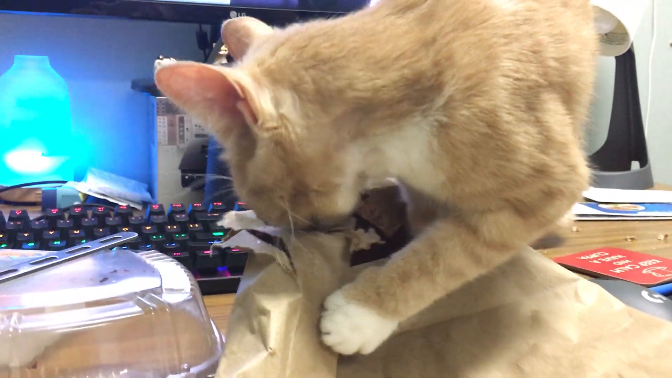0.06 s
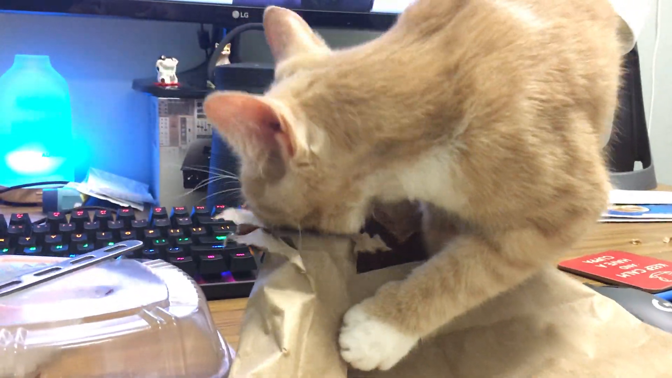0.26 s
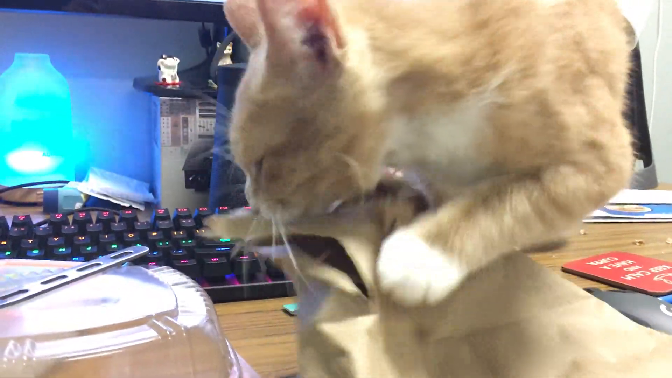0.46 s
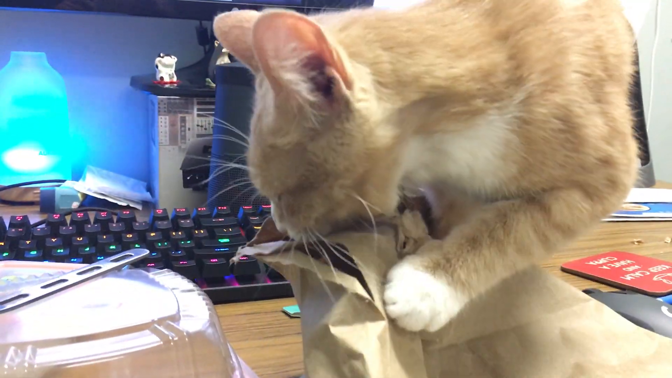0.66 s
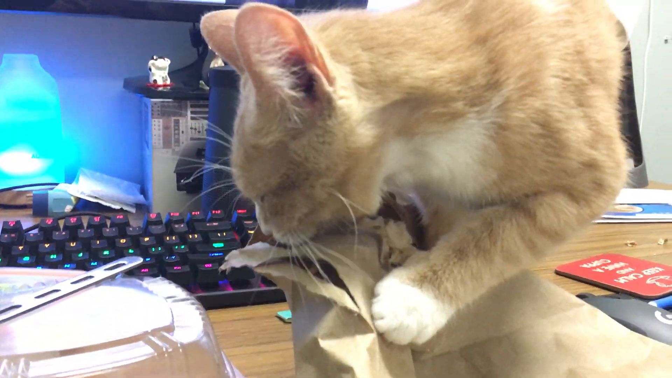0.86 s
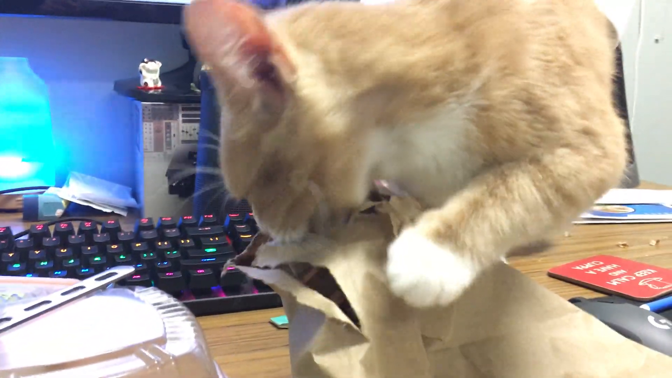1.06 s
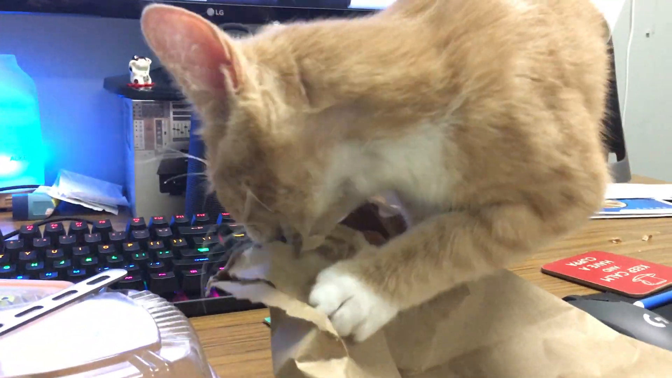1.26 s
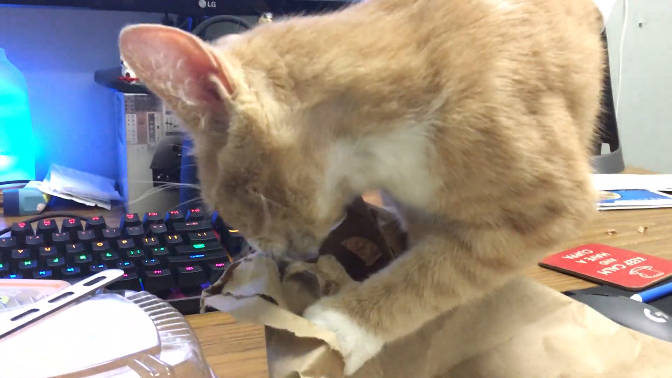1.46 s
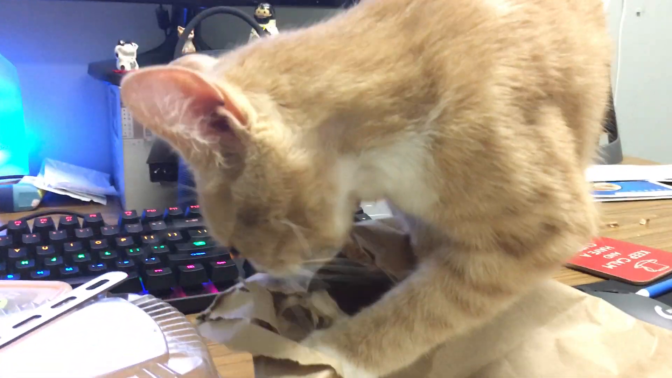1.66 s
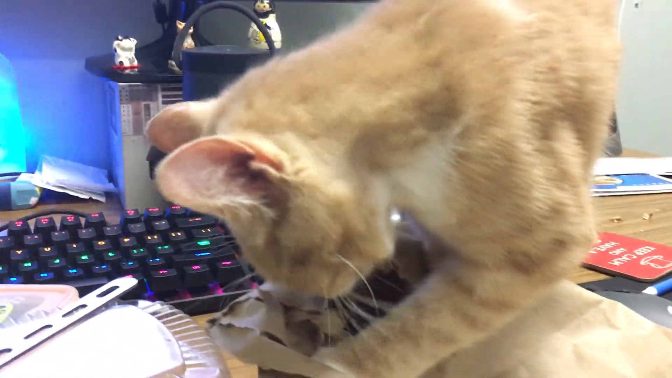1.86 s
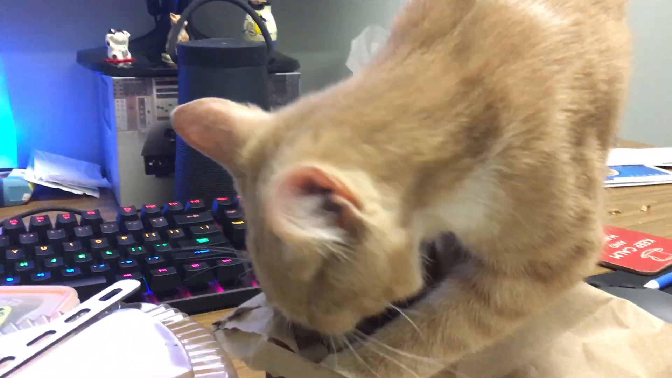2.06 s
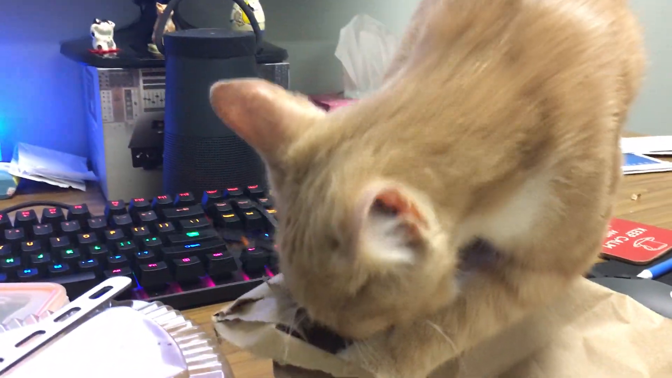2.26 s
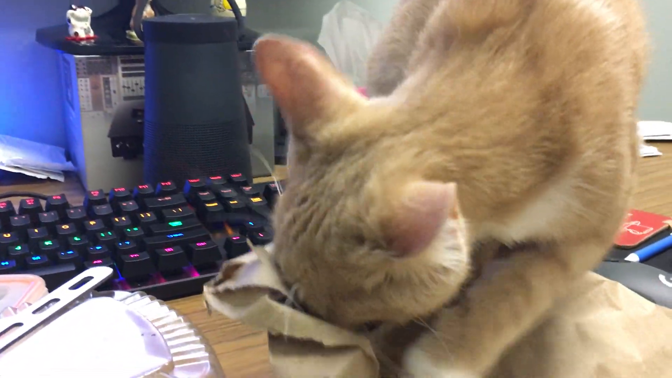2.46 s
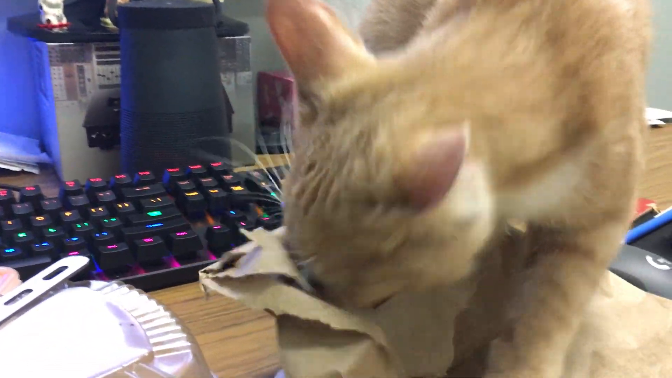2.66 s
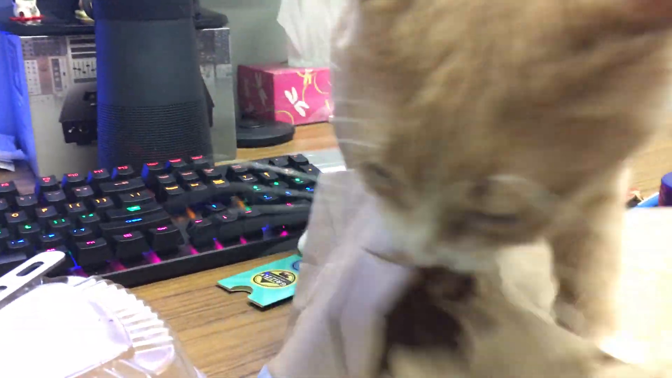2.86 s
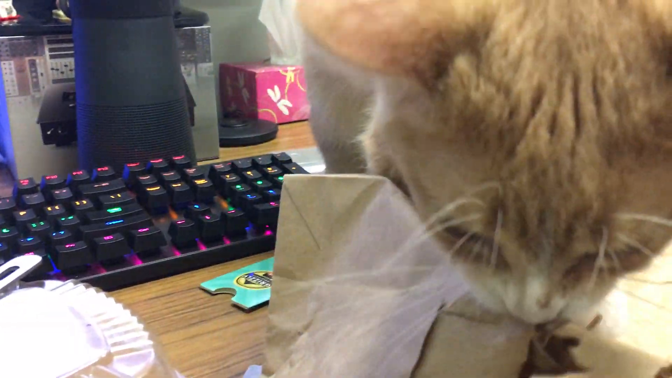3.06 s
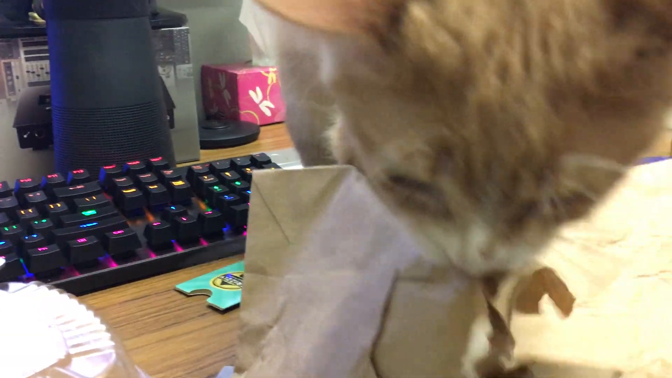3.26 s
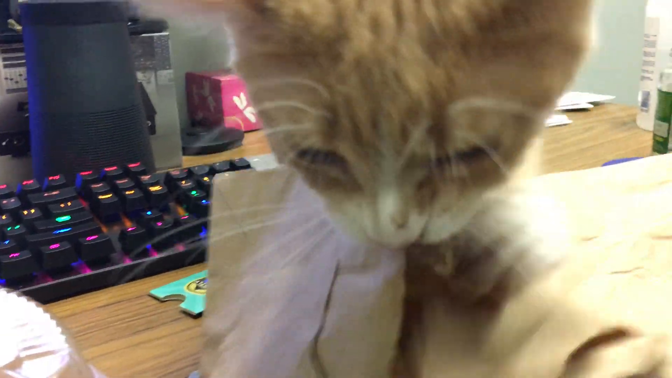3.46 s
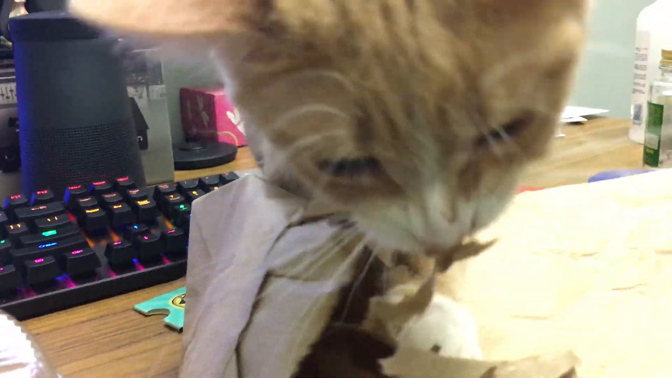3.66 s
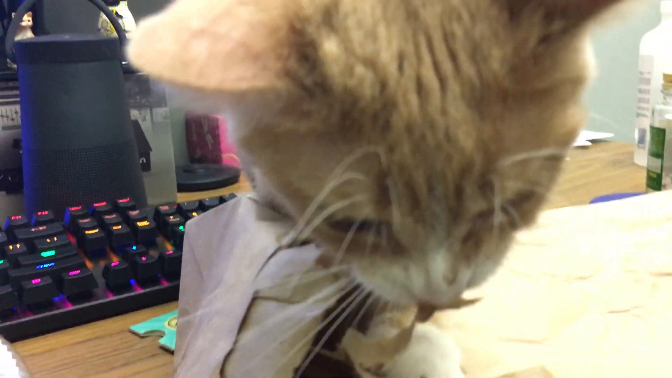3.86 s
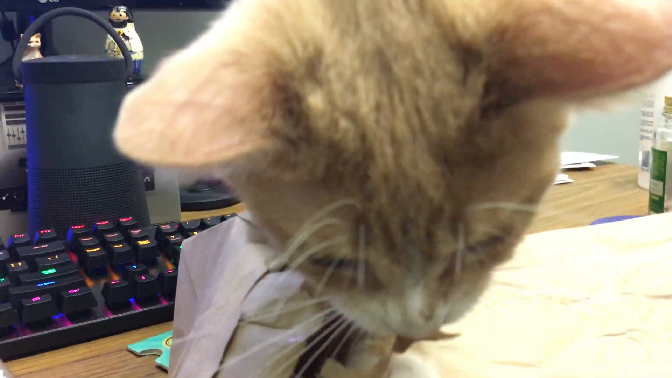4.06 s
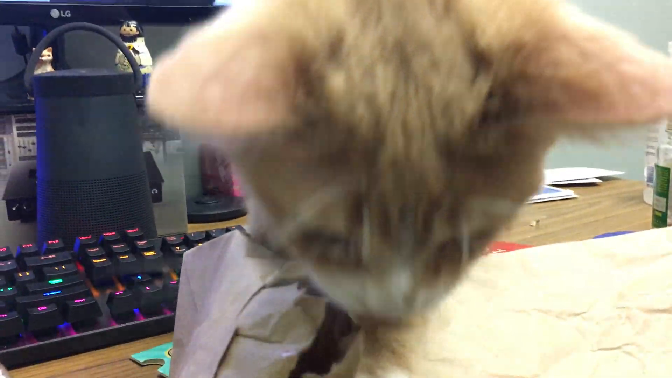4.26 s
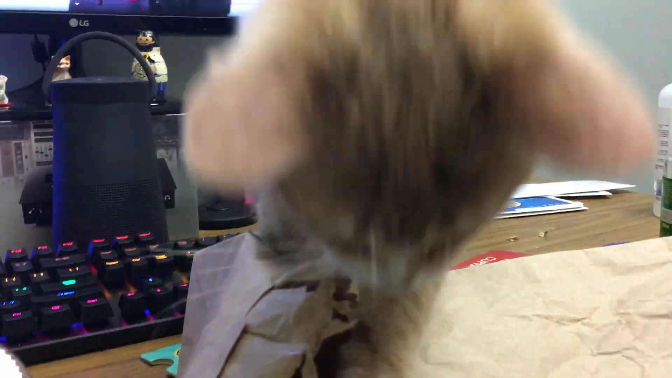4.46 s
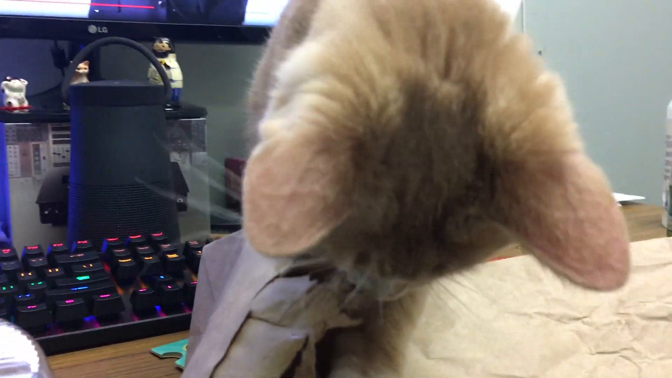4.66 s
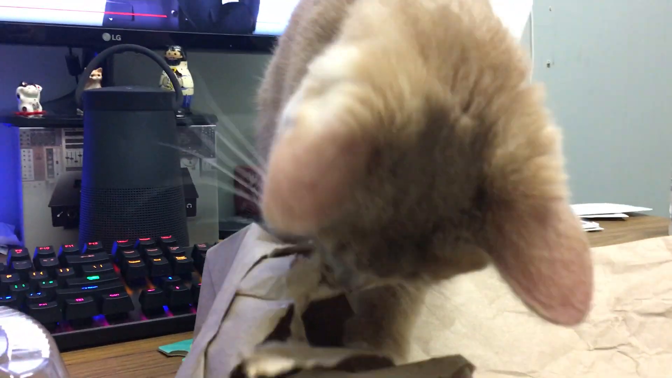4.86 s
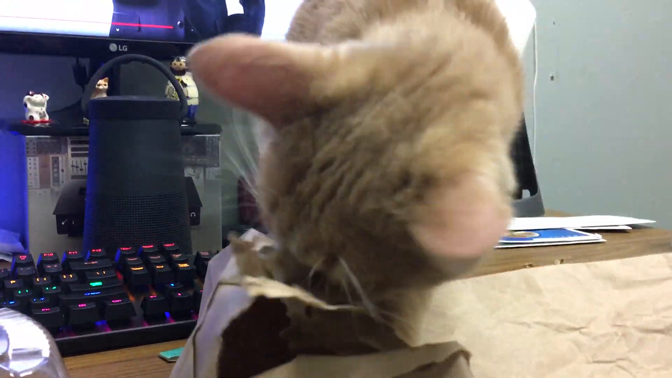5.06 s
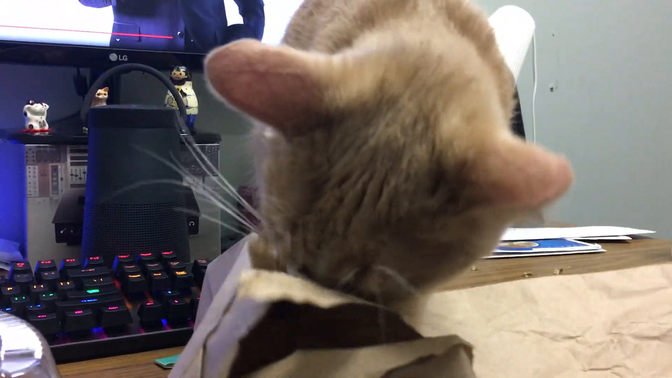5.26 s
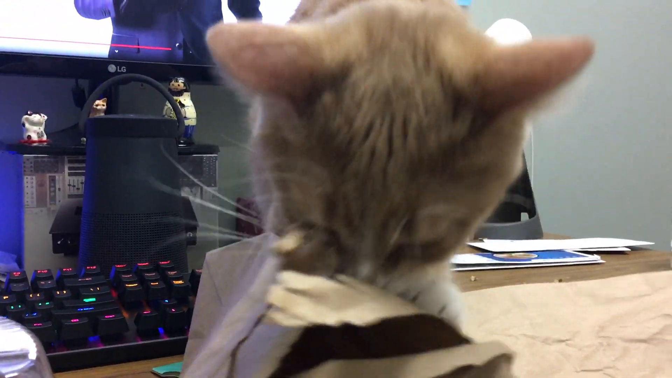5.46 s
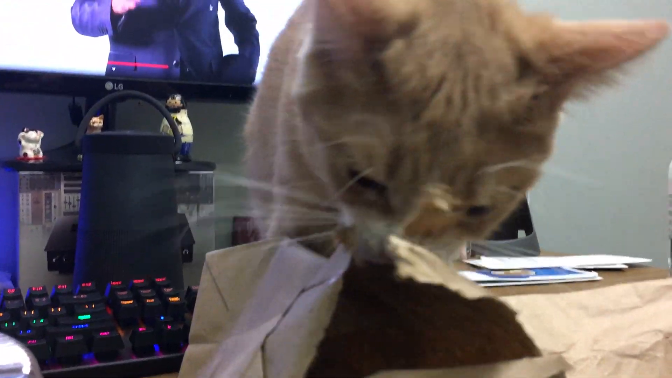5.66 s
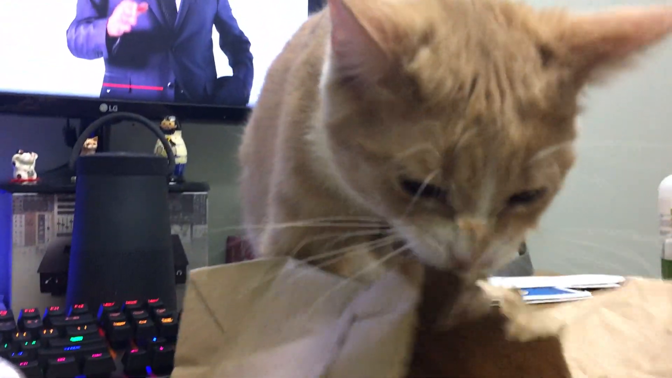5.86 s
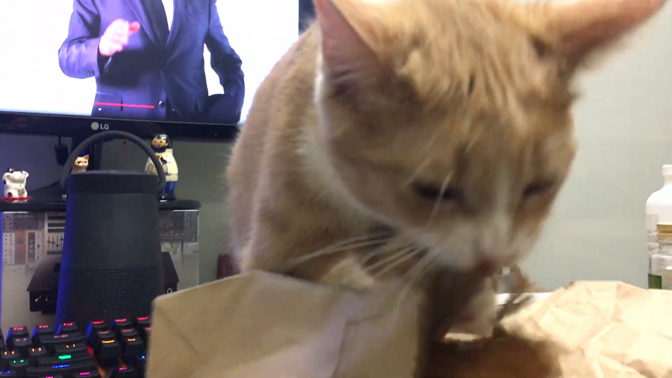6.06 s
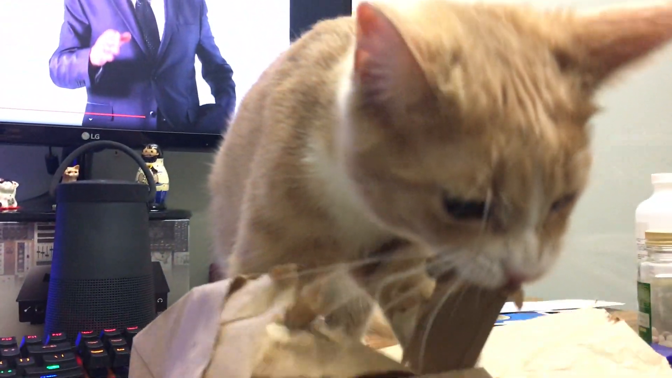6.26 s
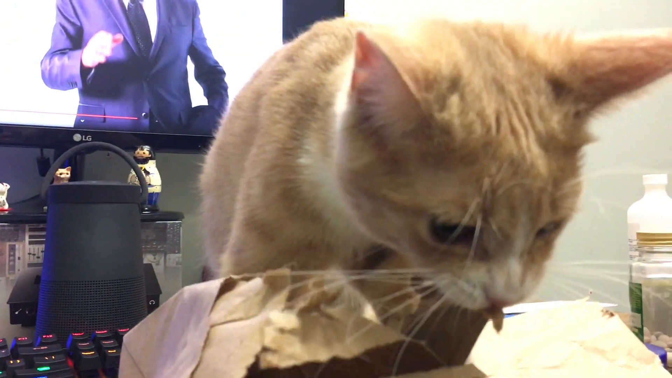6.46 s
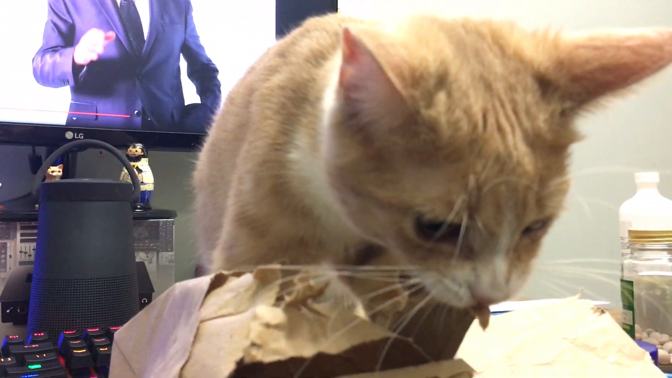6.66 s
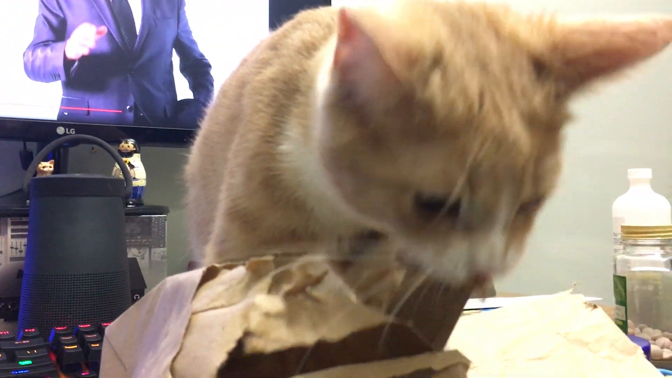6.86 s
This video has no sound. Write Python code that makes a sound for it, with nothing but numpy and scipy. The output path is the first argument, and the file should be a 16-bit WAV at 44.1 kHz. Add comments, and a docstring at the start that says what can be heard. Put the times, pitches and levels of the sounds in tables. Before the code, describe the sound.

Dry, close paper handling: slow rustles broken by crisp crease pops, short rips and hard clicks, with low muffled paw thumps on the desk top. Activity comes in clumps, strong around three seconds, nearly silent after four, loudest between five and a half and just past six, with a tiny high metal tinkle near its end. Then only a low fan hum and soft hiss remain in the small, slightly echoing room.

```python
"""A fan hums over microphone hiss in a small quiet room while a kitten works a paper bag on a desk.
Paper rustles, then creases snap: noise grains and slip bursts, through panel resonances and sheet colour.
Teeth rip it in dense swells of grains, paws thump the desk's low modes, stiff folds crack as clicks.
Late on, a small metal piece tinkles once as struck sines. Paper and metal also feed a short dull echo."""
import sys
import numpy as np
from scipy import signal
from scipy.fft import rfft, irfft
from scipy.io import wavfile

SR = 44100
rng = np.random.default_rng(int(sys.argv[2]) if len(sys.argv) > 2 else 0)


def unload_wav(signal):
    """Save mono or channel-first audio to the path in sys.argv[1] as 16-bit WAV at rate SR, clipped to [-1, 1]."""
    wavfile.write(
        sys.argv[1],
        SR,
        np.round(np.clip(np.atleast_2d(signal).T, -1, 1) * 32767).astype(np.int16),
    )


N = 304731


def amp(db):
    """Decibels to a linear gain."""
    return 10 ** (np.asarray(db) / 20)


def rms_one(x):
    """Scale a signal to an rms of 1."""
    return x / np.sqrt(np.mean(x ** 2) + 1e-20)


def at_hz(points, hz):
    """Read a spectrum in dB, straight between its points on a log frequency axis."""
    points_hz, points_db = np.array(points).T
    return np.interp(np.log(hz), np.log(points_hz), points_db)


def coloured(x, spectrum):
    """A causal minimum-phase filter of the given spectral shape; white noise keeps its rms."""
    size = 8192
    bins_hz = np.maximum(np.arange(size // 2 + 1) * SR / size, 1)
    cepstrum = irfft(np.log(amp(at_hz(spectrum, bins_hz))))
    cepstrum[1:size // 2] *= 2      # folding the cepstrum makes the phase minimum
    response = irfft(np.exp(rfft(cepstrum[:size // 2], size)))
    return signal.fftconvolve(x, response / np.sqrt(np.sum(response ** 2)))[:N]


def drift(rate_hz):
    """Slow random wander, spread 1: noise through two equal low-pass poles."""
    step = 40      # samples between computed points
    r = np.exp(-2 * np.pi * rate_hz * step / SR)
    noise = rng.standard_normal(N // step + 2002)
    slow = signal.lfilter([1], [1, -2 * r, r * r], noise)[2000:]
    return np.interp(np.arange(N) / step, np.arange(len(slow)), rms_one(slow))


def ring(clicks, hz, t60_s):
    """A struck mode: a unit click sets off a decaying sine of starting height 1."""
    r, w = amp(-60 / (t60_s * SR)), 2 * np.pi * hz / SR
    return signal.lfilter([0, np.sin(w)], [1, -2 * r * np.cos(w), r * r], clicks + 1e-18)


def panel(x, hz, sharpness):
    """A flat patch of paper between creases: one broad resonance, gain 1 on top."""
    return signal.lfilter(*signal.iirpeak(hz, sharpness, fs=SR), x)


# Tone of fan and hiss together: (f/Hz, relative level/dB per Hz)
HUM_TONE = [(25, -8), (60, 3), (95, -5.5), (130, -1.5), (240, -12), (480, -21), (1500, -31.5), (4800, -51),
            (10500, -37), (13000, -36)]
HUM_DB = -55.5      # rms level


def fan_and_hiss():
    """Steady noise shaped to the low hum of the fan and the high hiss of the microphone."""
    return amp(HUM_DB) * coloured(rng.standard_normal(N), HUM_TONE)


# Paper worked slowly by paws and fur: (t/s, body level/dB, treble level/dB), before the paper colour
RUSTLE_CURVE = [(0.0, -55.5, -58.5), (0.2, -68.5, -62.5), (0.421, -48, -53), (0.7, -67.5, -61),
                (0.87, -73.5, -71.5), (1.19, -68, -65.5), (1.25, -58, -57.5), (1.45, -65, -62),
                (1.82, -58.5, -59.5), (2.04, -64.5, -70), (2.249, -59, -54.5), (2.45, -64, -63.5),
                (2.85, -47, -50.5), (3.15, -60, -63), (3.5, -67.5, -67), (3.75, -66.5, -60),
                (4.0, -73.5, -79), (4.22, -74.5, -74.5), (4.45, -68.5, -65), (4.98, -66.5, -68.5),
                (5.19, -61.5, -57.5), (5.45, -64, -64), (5.75, -52, -49.5), (6.281, -48, -46.5),
                (6.35, -56.5, -81), (6.39, -64, -55), (6.57, -76.5, -74.5), (6.91, -74, -90)]


def rustle_levels():
    """Body and treble level of the slow rubbing, gliding in dB from point to point."""
    s, *levels_db = np.transpose(RUSTLE_CURVE)
    t = np.arange(N) / SR
    return amp([np.interp(t, s, db) for db in levels_db])


RIP_SLIDE = 0.35      # gain of the smooth slide within a rip


def crackle(rustle, rips, panels_hz, typical_per_s, size_db, grain_ms, grain_db, rip_grain_db):
    """Clumped grains, each a short puff on one of the panels, over a patchy slide; rips favour grains."""
    born = rng.random(N) < typical_per_s * amp(6.0 * drift(25)) / SR
    sizes = amp(size_db * np.minimum(rng.exponential(1, N), 2.2))
    dealt = rng.integers(0, len(panels_hz), N)      # the panel each grain lands on
    fade = np.exp(-1000 / grain_ms / SR)
    grains = np.zeros(N)
    for k, hz in enumerate(panels_hz):
        puff = signal.lfilter([1], [1, -fade], born * sizes * (dealt == k) + 1e-18)
        grains += rms_one(panel(puff * rng.standard_normal(N), hz, 3.9))
    slide = rng.standard_normal(N) * amp(2.0 * drift(30) + 1.5 * drift(10))
    grain_level = amp(grain_db) * rustle + amp(rip_grain_db) * rips
    slide_level = rustle + RIP_SLIDE * rips
    return grain_level * rms_one(grains) + slide_level * slide


# Creases buckling: (t/s, relative strength level/dB, treble level re strength/dB, panel pitch f/Hz)
CREASES = [(0.135, -33, -22, 1810), (0.297, -29, -6, 1020), (0.415, -22, -9.5, 4330),
           (0.436, -26, -10, 2020), (0.467, -10.5, -6, 1134), (0.49, -22.5, -12, 1900),
           (0.567, -29, -12, 4530), (1.269, -28, -17, 1820), (1.338, -35, -46, 1010),
           (1.394, -29.5, -10, 1900), (1.417, -24.5, -10.5, 1180), (1.461, -23, -14, 2140),
           (1.668, -17, -10.5, 3600), (1.7, -18, 1, 1890), (1.8746, -17.5, -17.5, 3540),
           (1.886, -12, -14.5, 1126), (1.932, -31, -18, 2480), (2.071, -12, -14.5, 3040),
           (2.459, -29.5, -15, 1900), (2.511, -22.5, -3, 2530), (2.551, -27.5, -11, 1840),
           (2.567, -25, -12.5, 1100), (2.637, -25, -17, 990), (2.718, -21, -11, 2500),
           (2.721, -12, -7, 1300), (2.754, -19.5, -11, 2000), (2.793, -14, -24, 925),
           (2.808, -7, -8.5, 1810), (2.839, -14, -14, 690), (2.93, -10.5, -15, 1690),
           (2.955, -16, -6, 4300), (3.092, -17.5, -12, 940), (3.255, -22.5, -18.5, 1800),
           (3.272, -20, -20, 2480), (3.357, -5, -6, 1930), (3.536, -20, -11.5, 2200),
           (3.56, -14, -11.5, 1540), (3.588, -9, -7, 1640), (3.708, -21, -9.5, 1800),
           (3.854, -22, -16, 1700), (3.862, -11, -4.5, 3400), (3.865, -13, -33, 1590),
           (4.257, -42, -13, 2520), (4.402, -37.5, -4, 1060), (4.78, -30.5, -40, 1050),
           (4.805, -36, -58, 1060), (4.852, -24.5, -45, 1710), (4.877, -24, -16, 1400),
           (4.952, -26, -47, 1530), (4.965, -36, -24, 2900), (5.134, -37, -41, 1700),
           (5.308, -30.5, 4, 2400), (5.379, -34, -13, 1700), (5.43, -30.5, -38.5, 1070),
           (5.468, -26, -40.5, 1250), (5.475, -11, -14.5, 3470), (5.512, -22.5, -15, 1940),
           (5.523, -17.5, -27, 3250), (5.54, -14, -15.5, 1440), (5.559, -19.5, -15, 1985),
           (5.574, -12.5, -8.5, 3040), (5.601, -17, -1.5, 900), (5.617, -17.5, -18, 1500),
           (5.653, -12.5, -3.5, 1650), (5.685, -15.5, -20.5, 2650), (5.704, -21, -9, 1690),
           (5.778, -18.5, -16, 1720), (5.801, -11, 0.5, 1200), (5.832, -23, -5, 3000),
           (5.847, -18, -2.5, 1950), (5.919, -12.5, -8.5, 3320), (5.975, -18, -10, 3820),
           (6.048, -10.5, -10.5, 3500), (6.062, -19, 1, 1590), (6.133, -8, -10.5, 4500),
           (6.213, -11, -19, 2360), (6.236, -28, 4, 810), (6.305, -15.5, -8.5, 2380),
           (6.374, -33, -5, 3170)]
PANEL_SHARPNESS = 6.0
PANEL_DB, PANEL_GAIN = -17, 0.27      # knock at a treble of 0 dB; dB more knock per dB less treble


def snaps(slip_ms, settle_ms, settle_db, dull_hz, fibre_hz):
    """A crease gives way in a ms or two of tiny slips, then settles; the panel beside it knocks."""
    size = 1024
    out, ms = np.zeros((2, N + size)), np.arange(size) / SR * 1000
    slips = rng.standard_normal((len(CREASES), 2, size)) * rng.uniform(0, 1, (len(CREASES), 1, size))
    slow = ms / slip_ms / np.array([[1.8], [1]])      # the heavy body builds up more slowly than the crack
    give = slow * np.exp(-slow ** 2)
    settle = amp(settle_db) * np.exp(-ms / settle_ms) * (1 - np.exp(-slow)) * [[1], [.3]]
    for (s, db, treble_db, hz), slip in zip(CREASES, slips):
        body, crack = slip * (give + settle)
        knock_db = PANEL_DB - PANEL_GAIN * treble_db
        knock = amp(knock_db) * rms_one(panel((slip * give)[0], hz, PANEL_SHARPNESS))
        # a crease weak in treble is dull throughout
        body_cut_hz = np.clip(dull_hz * amp(treble_db / 2), 0.71 * hz, 15000)
        crack_cut_hz = np.clip(fibre_hz * amp(treble_db / 2), 4000, 20000)
        body = signal.lfilter(*signal.butter(2, body_cut_hz, fs=SR), rms_one(body) + knock)
        crack = signal.lfilter(*signal.butter(2, crack_cut_hz, fs=SR), crack)
        # a small panel moves little air in the bass
        body = signal.lfilter(*signal.butter(1, 0.43 * hz, "high", fs=SR), body)
        burst = np.array([rms_one(body), rms_one(crack)]) / np.sqrt(size)
        out[:, round(s * SR):][:, :size] += burst * amp([[db], [db + treble_db]])
    return out[:, :N]


# Teeth and claws ripping: (start t/s, length t/s, body level/dB, treble level/dB), before the paper colour
RIP_BURSTS = [(0.455, 0.051, -43.5, -51.5), (1.644, 0.072, -48.5, -61), (2.778, 0.081, -52.5, -47.5),
              (2.874, 0.038, -42.5, -49), (2.917, 0.05, -41, -43.5), (3.22, 0.082, -47.5, -55),
              (3.334, 0.037, -39.5, -45), (3.535, 0.065, -36, -48), (4.514, 0.034, -67.5, -62),
              (5.248, 0.057, -73, -55), (5.58, 0.013, -32.5, -34.5), (5.658, 0.0057, -39, -37),
              (5.726, 0.033, -41.5, -31), (5.902, 0.04, -42, -35.5), (6.127, 0.03, -37.5, -32.5),
              (6.194, 0.023, -35.5, -34)]
RIP_RISE, RIP_TRAIL = 0.23, 0.19      # rise and trail as shares of a rip's length
UNFOLD_S, UNFOLD_DB = 0.069, -11      # decay time and level of the rustle after a rip


def rip_levels():
    """Levels of rips that build up and trail off, and of crushed paper unfolding ever more softly."""
    t = np.arange(N) / SR
    rips, unfolding = np.zeros((2, 2, N))
    for start, length, *rip_db in RIP_BURSTS:
        rise = np.clip((t - start) / (RIP_RISE * length), 0, 1)
        after = np.maximum(t - start - length, 0)
        height = amp(rip_db)[:, None]
        rips += rise * np.exp(-after / (RIP_TRAIL * length)) * height
        unfolding += rise * np.exp(-after / UNFOLD_S) * height * np.sqrt(length / UNFOLD_S)
    return rips, amp(UNFOLD_DB) * unfolding


# Paws pressing the desk: (t/s, strength level/dB, push length t/ms); a short push is brighter
PAW_PUSHES = [(0.464, -35, 1), (0.492, -30, 1.4), (0.555, -39, 1.1), (1.271, -34, 0.56), (2.801, -25, 4),
              (2.997, -29.5, 4.8), (3.546, -26, 4.2), (3.877, -32.5, 3.8), (5.59, -30, 3.1),
              (5.743, -38, 3), (5.947, -28, 3.7), (6.137, -23.5, 3.4)]
# Low modes of the desk top: (f/Hz, level re push/dB, decay by 60 dB t/s)
DESK_MODES = [(63, -12.5, 0.48), (146, -1.5, 0.06), (270, -10, 0.079), (329, -10, 0.075)]


def thumps():
    """A soft push sets the desk top ringing at its low modes."""
    pushes = np.zeros(N)
    for s, db, push_ms in PAW_PUSHES:
        push = signal.windows.hann(round(push_ms * SR / 1000))
        pushes[round(s * SR):][:len(push)] = push / push.sum() * amp(db)
    return sum(amp(db) * ring(pushes, hz, t60_s) for hz, db, t60_s in DESK_MODES)


# Stiff folds breaking at once: (t/s, click level/dB), before the paper colour
FOLD_BREAKS = [(3.588, -1.5), (5.257, -30), (5.275, -25), (5.283, -32), (5.291, -34), (5.301, -32),
               (5.338, -25), (5.368, -31), (5.728, -18.5), (5.752, -10), (5.919, -17), (5.927, -6.5),
               (6.06, -6.5), (6.195, -27)]


def cracks(fray_ms, fray_db):
    """One sudden break, then a few fibres part in about a ms."""
    size = 128
    out, ms = np.zeros(N + size), np.arange(size) / SR * 1000
    frays = rng.standard_normal((len(FOLD_BREAKS), size)) * amp(fray_db) * np.exp(-ms / fray_ms)
    for (s, db), fray in zip(FOLD_BREAKS, frays):
        out[round(s * SR):][:size] += amp(db) * (fray - (ms == 0))
    return out[:N]


# Body tone of the paper sheet: (f/Hz, relative level/dB per Hz)
BODY_TONE = [(150, 5.5), (300, 1.5), (600, -7), (1000, -3.5), (1800, -5), (3200, -6), (5000, -13),
             (7500, -21), (16000, -68.5)]
# Treble tone of fibres tearing and sliding: (f/Hz, relative level/dB per Hz)
TREBLE_TONE = [(1000, -13), (4900, -8.5), (6200, -3.5), (8000, -7.5), (10500, -6), (12500, -6), (15500, -7)]


def paper():
    """Snaps, cracks and crackle drive the sheet, which colours their body and treble separately."""
    snap_body, snap_treble = snaps(slip_ms=1.5, settle_ms=10.8, settle_db=-10.0,
                                   dull_hz=15900, fibre_hz=21400)
    rips, unfolding = rip_levels()
    rustle = rustle_levels() + unfolding
    body_crackle = crackle(rustle[0], rips[0], np.geomspace(750, 5000, num=8), typical_per_s=500,
                           size_db=3.5, grain_ms=2.9, grain_db=-7.0, rip_grain_db=-4.0)
    treble_crackle = crackle(rustle[1], rips[1], np.geomspace(4000, 14000, num=4), typical_per_s=710,
                             size_db=7.0, grain_ms=1.0, grain_db=-4.5, rip_grain_db=3.5)
    body = amp(5.5) * snap_body + body_crackle
    treble = amp(15.0) * snap_treble + treble_crackle + cracks(fray_ms=0.97, fray_db=-9.0)
    return coloured(body, BODY_TONE) + coloured(treble, TREBLE_TONE)


# Modes of the metal piece: (f/Hz, level re touch/dB, decay by 60 dB t/s, added slope once landed/dB per s)
METAL_MODES = [(7276, -11, .5, -900), (11646, -3, .9, -1300), (12717, 0, .45, -350)]
# Touches on the metal: (t/s, level/dB)
METAL_TOUCHES = [(6.237, -29.5), (6.26, -30)]
METAL_STOP_S = 6.312      # it lands and is damped


def metal():
    """Each touch strikes all modes; they ring freely until the piece lands, then die faster."""
    clicks = np.zeros(N)
    for s, db in METAL_TOUCHES:
        clicks[round(s * SR)] = amp(db)
    landed = np.maximum(np.arange(N) / SR - METAL_STOP_S, 0)
    return sum(amp(db + damp * landed) * ring(clicks, hz, t60_s) for hz, db, t60_s, damp in METAL_MODES)


ECHO_T60_S, ECHO_DB, ECHO_CUT_HZ = 0.23, -16, 1520


def room(x):
    """Diffuse echoes: dull noise that builds up over the desk and wall paths and dies away."""
    t = np.arange(SR // 2) / SR
    tail = rng.standard_normal(len(t)) * amp(-60 * t / ECHO_T60_S) * np.clip(t / 0.0038, 0, 1)
    tail = signal.sosfilt(signal.butter(1, ECHO_CUT_HZ, fs=SR, output="sos"), tail)
    return amp(ECHO_DB) * signal.fftconvolve(x, tail / np.sqrt(np.sum(tail ** 2)))[:N]


def scene():
    """Paper and metal with their echo, plus the dry thumps and the steady fan and hiss."""
    near = paper() + metal()
    return (near + room(near) + thumps() + fan_and_hiss())[None]


CUTOFF_HZ = 15900


def record(dry):
    """The microphone drops the deepest bass; the top is cut steeply."""
    dry = signal.sosfilt(signal.butter(4, 40, "high", fs=SR, output="sos"), dry)
    return signal.sosfilt(signal.ellip(10, 1, 70, CUTOFF_HZ, fs=SR, output="sos"), dry)


dry = scene()
out = record(dry)
unload_wav(out)
```